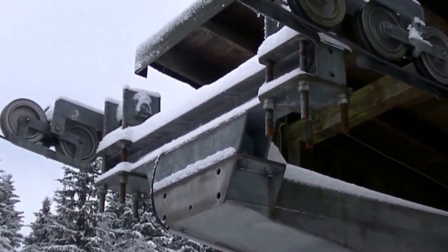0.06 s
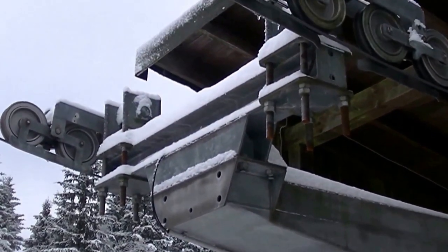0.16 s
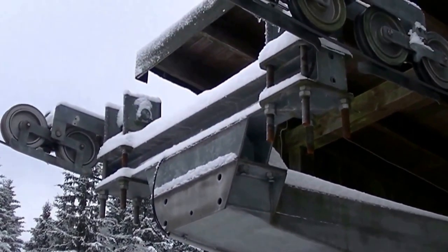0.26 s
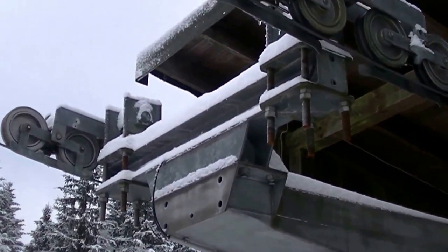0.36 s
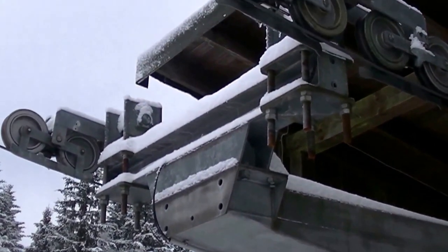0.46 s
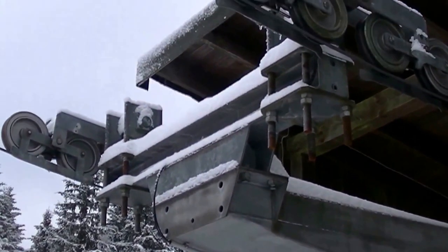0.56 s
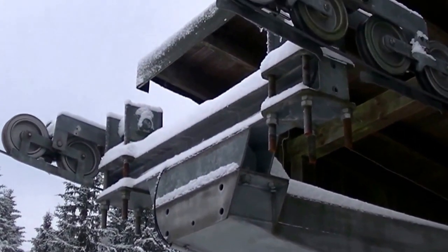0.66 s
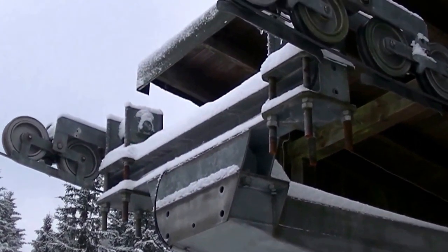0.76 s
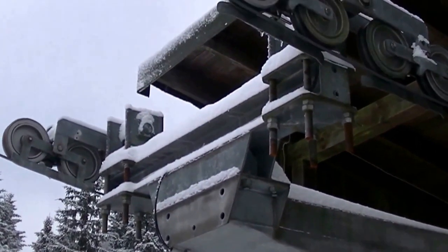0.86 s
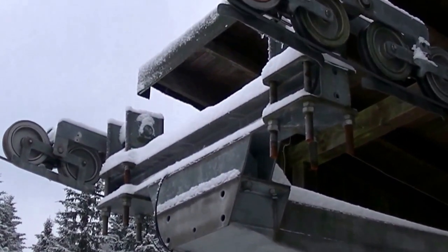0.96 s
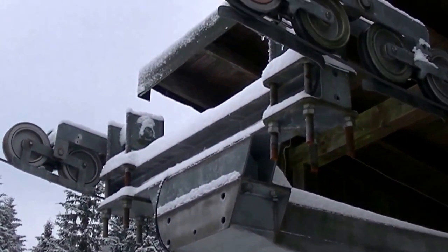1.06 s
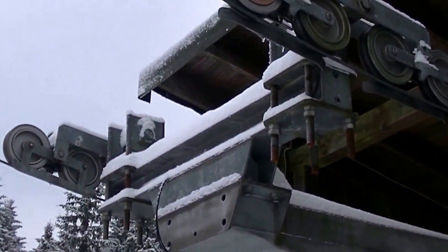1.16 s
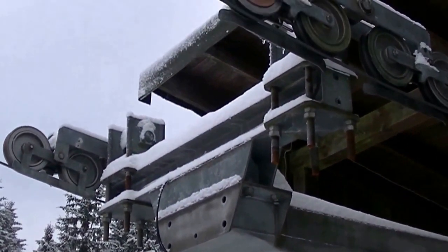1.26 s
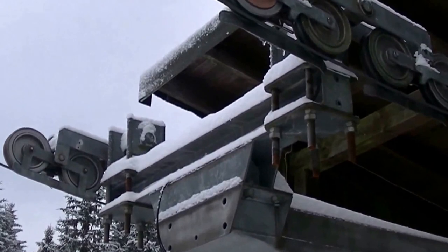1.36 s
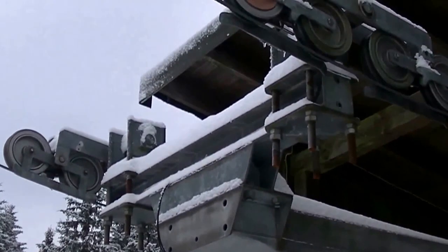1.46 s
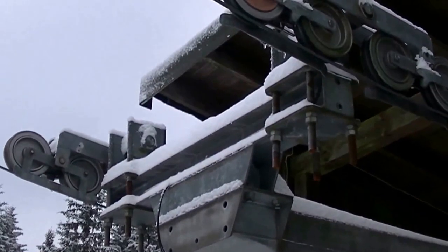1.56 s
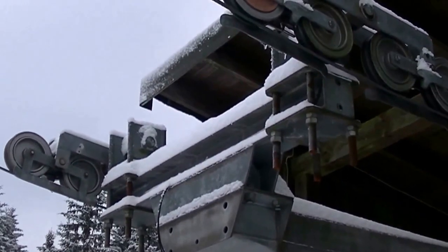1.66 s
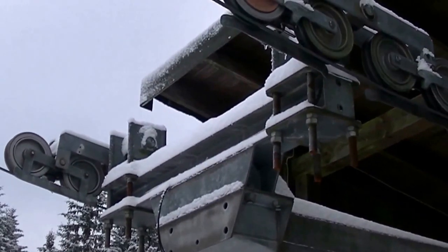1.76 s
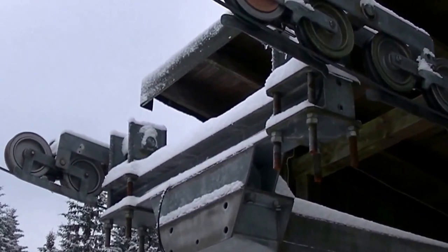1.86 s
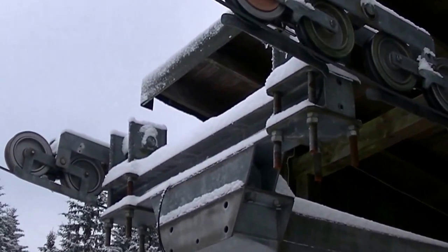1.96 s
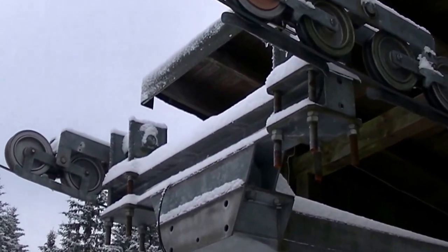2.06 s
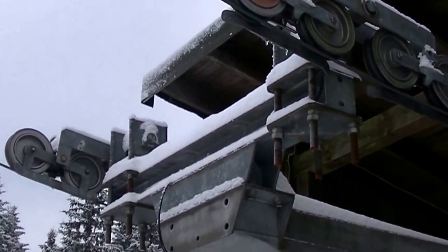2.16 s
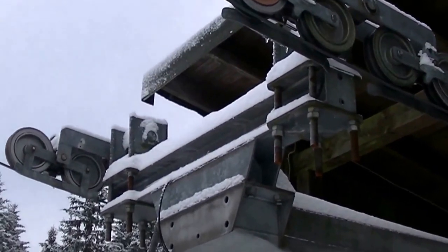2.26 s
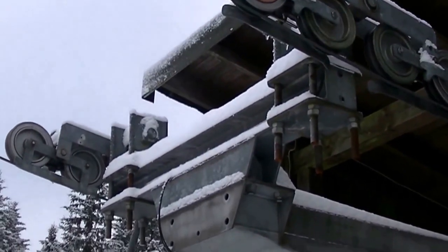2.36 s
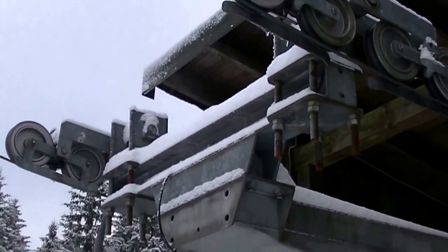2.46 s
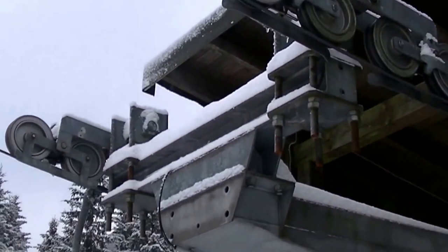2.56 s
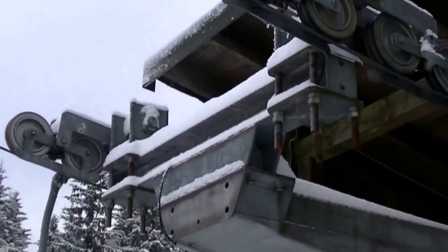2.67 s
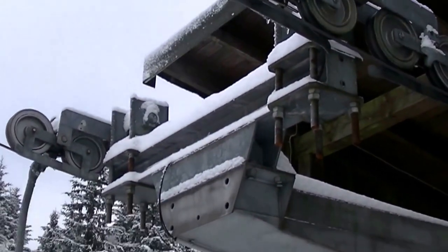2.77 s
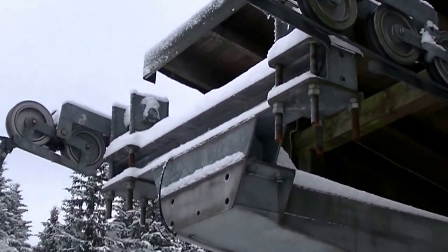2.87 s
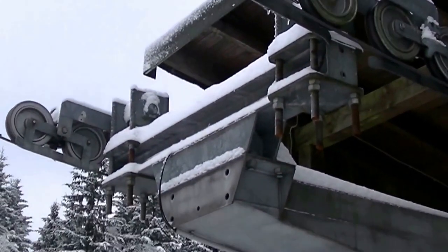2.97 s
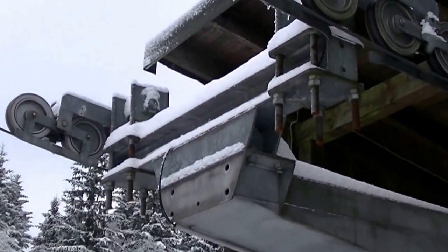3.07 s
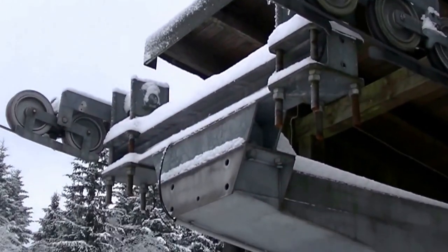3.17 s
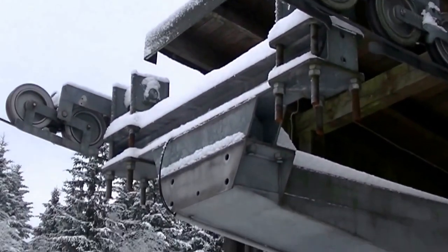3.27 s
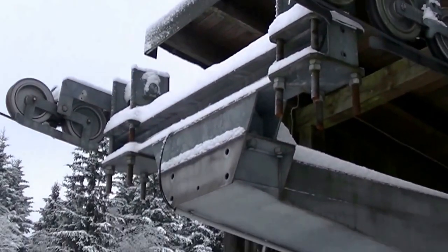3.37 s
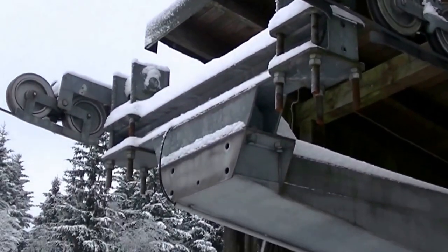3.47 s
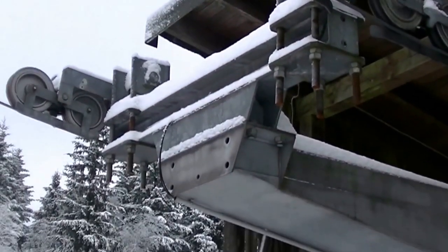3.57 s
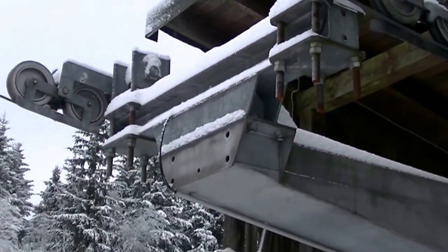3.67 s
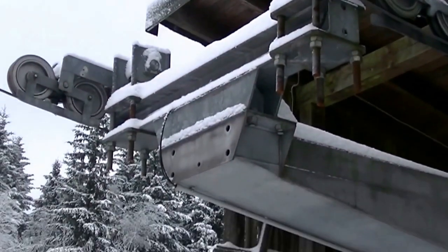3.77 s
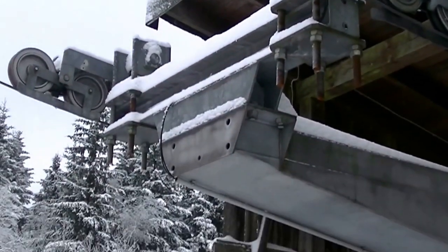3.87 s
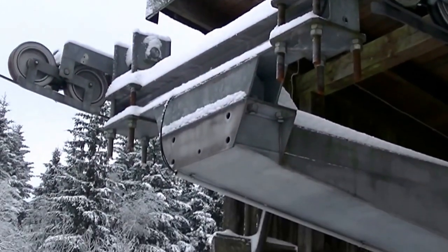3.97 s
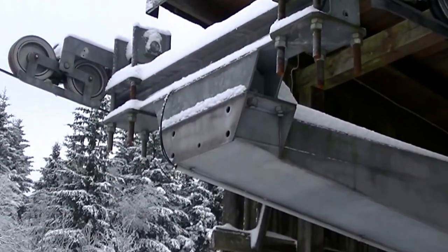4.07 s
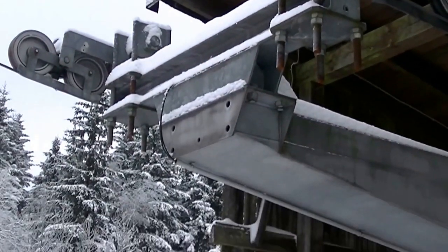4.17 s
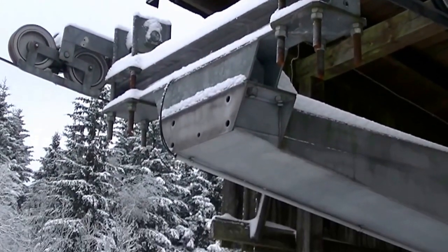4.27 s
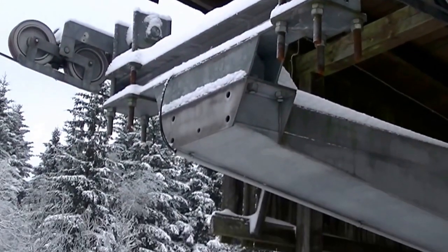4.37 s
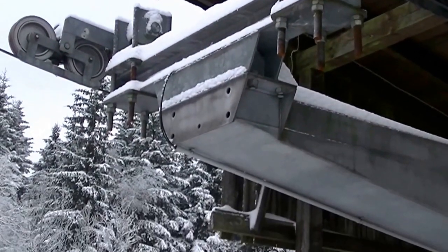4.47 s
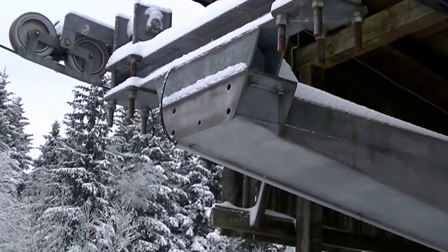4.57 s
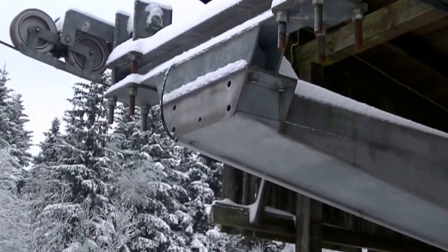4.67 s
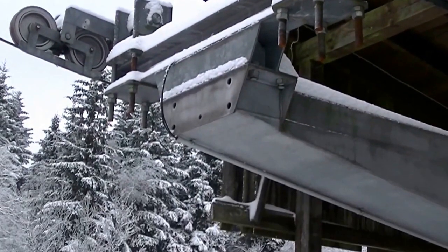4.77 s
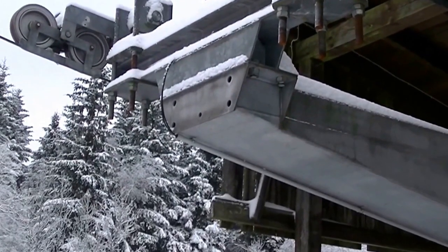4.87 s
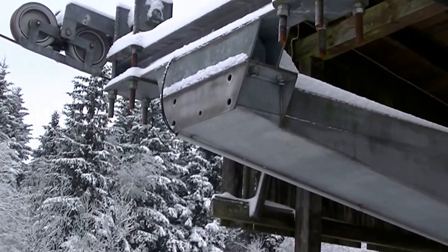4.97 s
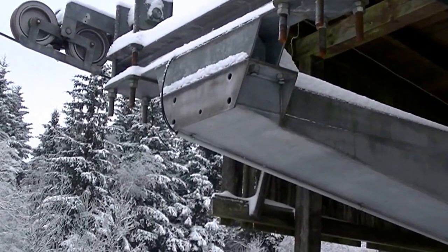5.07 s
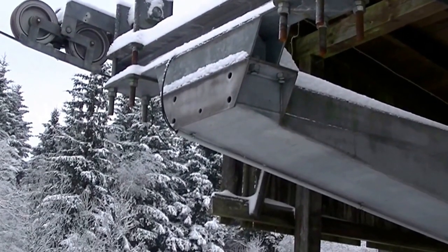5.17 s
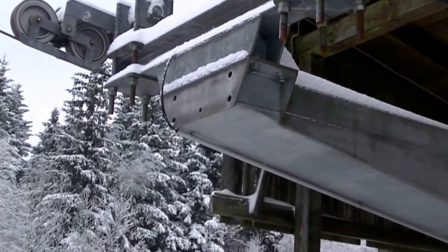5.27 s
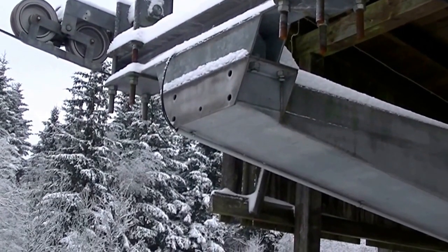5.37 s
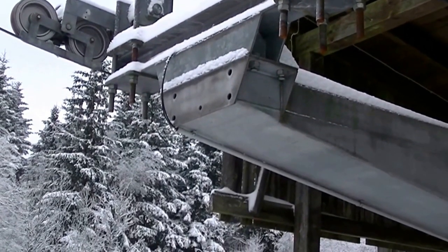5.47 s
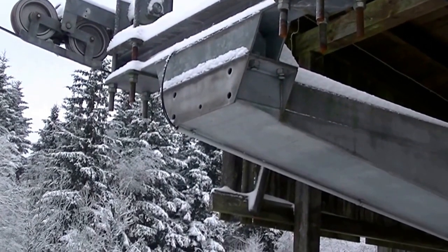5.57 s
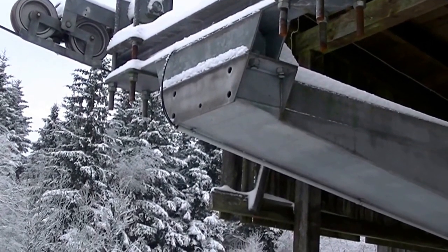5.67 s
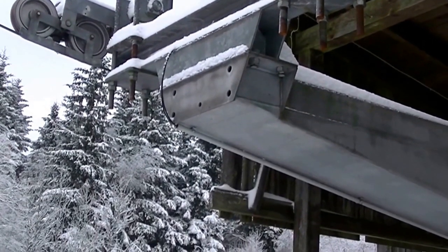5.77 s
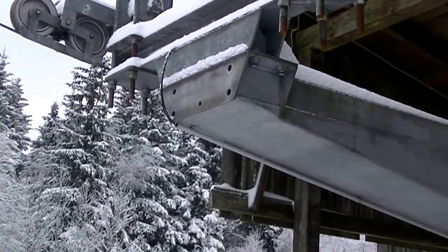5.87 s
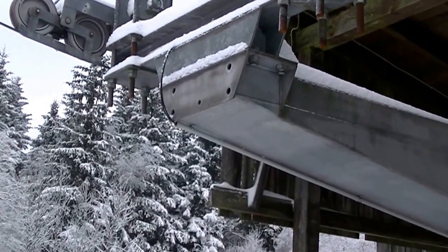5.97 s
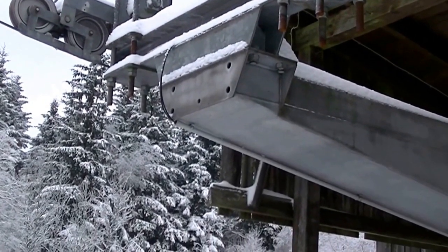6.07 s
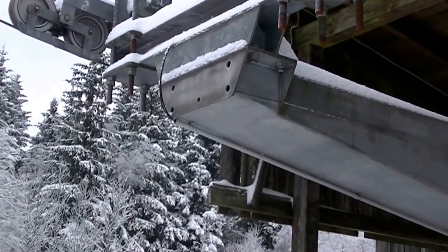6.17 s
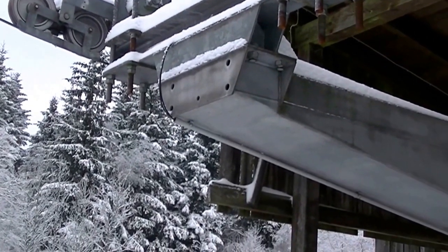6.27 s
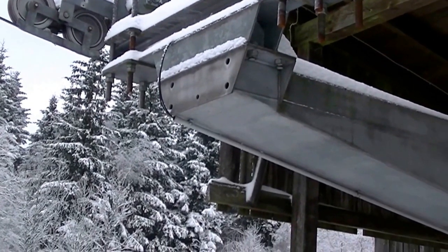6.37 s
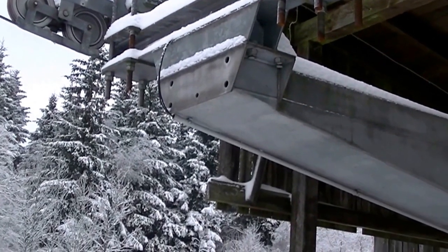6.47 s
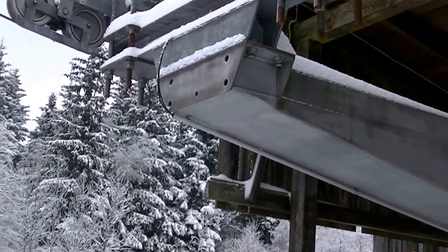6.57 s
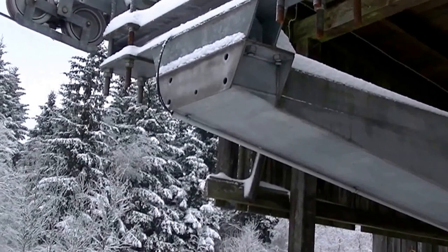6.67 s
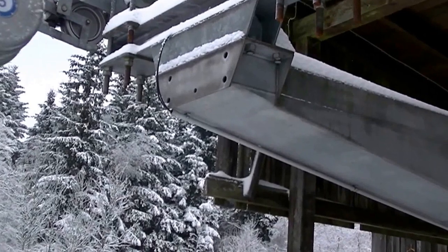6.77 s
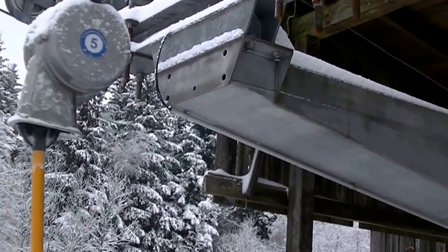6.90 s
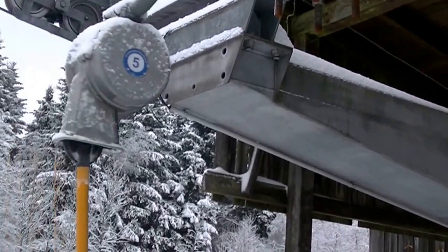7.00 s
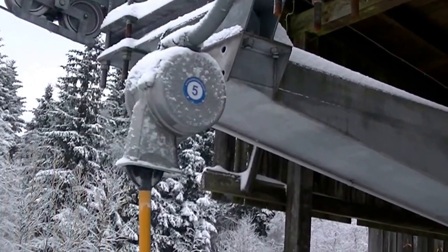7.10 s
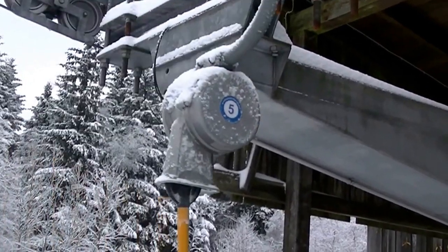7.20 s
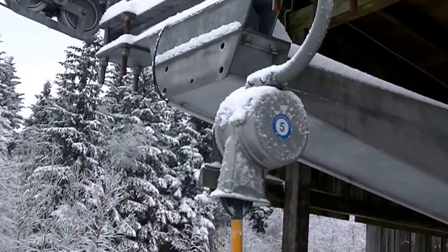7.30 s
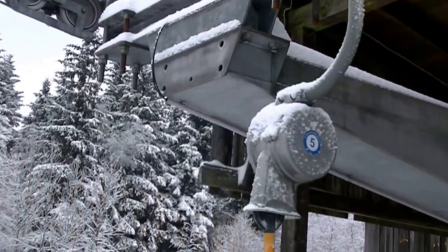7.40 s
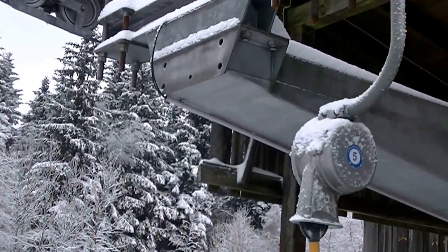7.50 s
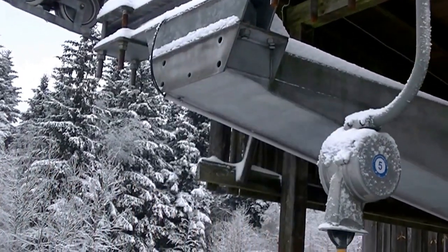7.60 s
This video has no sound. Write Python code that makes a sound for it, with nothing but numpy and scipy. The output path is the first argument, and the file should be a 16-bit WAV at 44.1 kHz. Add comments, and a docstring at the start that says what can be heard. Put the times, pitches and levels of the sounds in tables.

```python
"""An empty drag lift runs in a snowy wood, heard from under its steel end station.
From the start the twisted cable drums on the wheels as a comb of hum lines, with faint drive whines.
Rope and bearings hiss through the ringing frame, a dry bearing squeals and loose parts rattle faintly.
From about 2.2 s a loose catch ticks, and the grips of passing hangers knock and rattle over the wheels.
A few soft bumps of the hand follow from 3.2 s; ticks and rattling return after 5 s, knocks after 7 s."""
import sys
import numpy as np
from scipy import signal
from scipy.fft import rfft, irfft
from scipy.io import wavfile
from scipy.ndimage import map_coordinates

SR = 44100
rng = np.random.default_rng(int(sys.argv[2]) if len(sys.argv) > 2 else 0)


def pcm_store(signal):
    """Save signal as 16-bit PCM."""
    levels = np.round(np.clip(np.atleast_2d(signal), -1, 1) * 32767)
    wavfile.write(sys.argv[1], SR, levels.astype(np.int16).T)


def convert_level_to_amplitude(level_db):
    """Map a level in decibels to its linear amplitude factor."""
    exponent = np.asarray(level_db, float) / 20
    return 10 ** exponent


N = 336924
T = np.arange(N) / SR  # time of each sample, s
F = np.maximum(np.fft.rfftfreq(N, 1 / SR), 1)  # frequency of each spectrum bin, Hz


def unit(x):
    """Scale to rms 1."""
    return x / np.sqrt(np.mean(x ** 2))


def over_hz(table, hz=F):
    """Read (Hz, value) rows on a log-frequency axis."""
    f, v = np.transpose(table)
    return np.interp(np.log(hz), np.log(f), v)


def over_time(table):
    """Read every column of (s, value, ..) rows at each sample."""
    s, *columns = np.transpose(table)
    return [np.interp(T, s, c) for c in columns]


def walk(rate):
    """Smooth chance that turns about rate times a second; spread near 1."""
    points = rng.standard_normal(200)
    coarse = T[::64]
    curve = map_coordinates(points, [coarse * rate], order=3, mode="wrap")
    return np.interp(T, coarse, curve)


def tone(hz, waver_db, drift):
    """A sine whose level and phase wander, as several wheels sound it a little out of step."""
    phase = 2 * np.pi * (hz * T + rng.random()) + drift * walk(2.5)
    return np.sqrt(2) * convert_level_to_amplitude(waver_db * walk(3.418)) * np.sin(phase)


def hum():
    """Cable strands crossing the wheels drum at multiples of one rate; the drive adds faint whines."""
    strand_hz = 15.478  # strands of the cable crossing a wheel each second
    # Hum lines. Each row: multiple of the strand rate, level in dB.
    hum_lines = [(7, -88), (9, -83), (10, -81), (13, -70.5), (14, -71), (15, -70), (16, -66), (19, -71),
                 (20, -69), (22, -65), (23, -66), (24, -66), (27, -66), (28, -64), (29, -63), (31, -63),
                 (32, -70), (33, -68), (34, -60), (35, -67), (36, -61), (37, -71), (38, -68), (39, -67),
                 (41, -71), (44, -62), (51, -67)]
    # The two loudest lines swell and fade as the wheels drift in and out of step.
    # Each row of both: time in seconds, level in dB.
    deep_line = [(0.0, -50.5), (0.59, -48), (1.06, -59), (1.51, -50.5), (1.76, -56.5), (2.53, -50.5),
                 (2.64, -57.5), (3.51, -48), (4.06, -53), (5.26, -57), (5.3, -52.5), (6.21, -49.5),
                 (6.43, -56.5), (7.06, -47.5), (7.4, -51.5), (7.43, -61), (7.6, -50), (7.64, -57)]
    high_line = [(0, -55), (.28, -50), (.46, -63), (.6, -50), (.78, -61), (1.17, -50.5), (1.5, -73),
                 (2.14, -55.5), (2.34, -51), (2.7, -64), (3.11, -69), (3.26, -49), (3.53, -73),
                 (3.88, -44.5), (4.05, -60), (4.18, -51.5), (4.49, -63), (4.7, -51), (5.7, -65),
                 (5.98, -48), (6.46, -62.5), (7.08, -55), (7.51, -46.5), (7.64, -56)]
    # Whines of the drive. Each row: pitch in Hz, level in dB.
    drive_whines = [(984, -66), (1297, -67.5), (1610, -68.5)]
    comb = sum(convert_level_to_amplitude(db) * tone(k * strand_hz, waver_db=2.2, drift=.85) for k, db in hum_lines)
    deep = convert_level_to_amplitude(*over_time(deep_line)) * tone(21 * strand_hz, waver_db=1, drift=.2)
    high = convert_level_to_amplitude(*over_time(high_line)) * tone(26 * strand_hz, waver_db=1, drift=.5)
    whines = sum(convert_level_to_amplitude(db) * tone(hz, waver_db=2.5, drift=1.94) for hz, db in drive_whines)
    return comb + deep + high + whines


def smear(t60):
    """Countless small plate modes: a noisy ring falling 60 dB in t60 s, even on average, finely rippled."""
    ring = rng.standard_normal(SR // 4) * np.exp(-np.log(1000) * T[:SR // 4] / t60)
    return rfft(unit(ring), N) / np.sqrt(SR // 4)


def frame_colour():
    """Broad colour of the running noise, the frame's peaks as one listening place finds them, and its fine ripple."""
    # Broad colour. Each row: frequency in Hz, relative level in dB.
    hiss_colour = [(30, -43), (95, -30.5), (150, -14), (330, -3.5), (600, -0.5), (720, -7.5), (1300, -5.5),
                   (2250, -7.5), (2700, -3), (3800, -2), (5600, 0), (6100, -5), (9800, -24), (10300, -31),
                   (15500, -29.5)]
    # Resonances of the steel frame, before small chance shifts.
    # Each row: frequency in Hz, width in Hz, lift in dB.
    frame_peaks = [(840, 23, 3.5), (1085, 13, 4.5), (1640, 120, 3), (2578, 20, 7), (2713, 16, 6),
                   (2925, 75, 3.5), (3400, 460, 4.5), (3935, 22, 5), (4150, 28, 5), (4400, 400, 1.5),
                   (4900, 92, 5), (5010, 440, 2.5), (5290, 86, 5.5), (5450, 25, 3), (5640, 24, 4.5),
                   (12000, 1950, 7)]
    lift = 0
    for hz, width, db in frame_peaks:
        louder, higher = rng.standard_normal(2)
        offset = (F - hz * (1 + .0025 * higher)) / width
        lift = lift + (convert_level_to_amplitude(db + 1.5 * louder) ** 2 - 1) / (1 + (2 * offset) ** 2)
    peaks = np.sqrt(np.maximum(1 + lift, .1))
    return convert_level_to_amplitude(over_hz(hiss_colour)) * peaks * (1 + .3 * smear(.12))


def grit(rate, spread_db):
    """Scattered clicks of uneven size, about rate of them a second, scaled to rms 1."""
    where, size, sign = rng.random((3, N))
    loudness = convert_level_to_amplitude(-spread_db * np.log(size + 0.013))
    return unit((where < rate / SR) * loudness * np.sign(sign - .5))


def running():
    """Rope and bearings: hiss plus grit, each octave flickering; the frame's peaks shift as the microphone drifts."""
    # Loudness of the hiss before a steady 0.5 dB lift. Each row: time in seconds, level in dB.
    run_level = [(0.0, -42), (1.25, -42), (2.72, -42), (6.74, -41.5), (7.45, -41), (7.64, -40.5)]
    push = rfft(rng.standard_normal(N) + convert_level_to_amplitude(-7.5) * grit(900, spread_db=4.0))
    together, flicker = walk(14), 0
    for octave in range(8):
        # overlapping octave bands, counted up from 90 Hz
        share = np.clip(1 - abs(np.clip(np.log2(F / 90), 0, 7) - octave), 0, 1)
        waver_db = 0.2 * together + (0.57 + 0.028 * octave) * walk(9)
        flicker = flicker + irfft(push * share, N) * convert_level_to_amplitude(waver_db)
    push, hiss = rfft(flicker), 0
    places = np.linspace(0, T[-1], 5)
    for s in places:
        # fade from one listening place into the next
        nearness = np.clip(1 - abs(T - s) / places[1], 0, 1)
        hiss = hiss + nearness * irfft(push * frame_colour(), N)
    return unit(hiss) * convert_level_to_amplitude(over_time(run_level)[0] + 0.5)


def shaking():
    """Strength of the rattle: a steady faint part plus a quick rise and slow fade at each shake."""
    rattle_db, rise_s = -56.5, 0.0037
    # Spells of rattling, before their rise and fade.
    # Each row: start in seconds, level in dB, fade time in seconds.
    shakes = [(2.22, -45.5, 0.92), (2.62, -50, 0.46), (3.08, -48, 0.18), (6.42, -44.5, 0.27),
              (6.82, -44, 0.4), (7.22, -42, 0.57), (7.48, -44.5, .3)]
    power = convert_level_to_amplitude(rattle_db) ** 2
    for s, db, fade_s in shakes:
        since = np.maximum(T - s, 0)
        swell = (1 - np.exp(-since / rise_s)) * np.exp(-since / fade_s)
        power = power + (convert_level_to_amplitude(db) * swell) ** 2
    return np.sqrt(power)


def rattle():
    """Loose parts chatter as sparse clicks that ring the frame, with more middle than the hiss."""
    body = 1 + convert_level_to_amplitude(4.5) / (1 + ((F - 1100) / 900) ** 2)
    bass_cut = 1 / (1 + (200.0 / F) ** 4)
    clicks = rfft(grit(700, spread_db=3.0))
    chatter = irfft(clicks * smear(0.021) * frame_colour() * body * bass_cut, N)
    return unit(chatter) * shaking()


def squeal():
    """A dry bearing: gritty rubbing in three narrow resonances, each swelling on its own."""
    # Resonances of the squeal. Each row: frequency in Hz, width in Hz, middle level in dB.
    squeal_peaks = [(3290, 40, -57.5), (3410, 60, -56), (3665, 30, -59)]
    push = rfft(rng.standard_normal(N) + grit(1500, spread_db=2.0))
    out = 0
    for hz, width, db in squeal_peaks:
        ring = unit(irfft(push / (1 + 2j * (F - hz) / width), N))
        out = out + ring * convert_level_to_amplitude(db + 1.5 * walk(3.0) + 2.5 * walk(17))
    return out


def air():
    """Faint low air noise that differs left and right."""
    noise = irfft(rfft(rng.standard_normal((2, N))) / (1 + (F / 110) ** 2), N)
    return convert_level_to_amplitude(-87.0) * unit(noise)


def ticks():
    """Small bright ticks of a loose catch: three modes near 5 kHz and three higher ones, soon gone."""
    # Ticks, at strengths that are later shared among the modes.
    # Each row: start in seconds, strength in dB of the lower three modes, of the higher three.
    catch_ticks = [(2.19, -34, -35), (2.5983, -32, -35), (5.486, -28, -50), (6.488, -30, -35),
                   (6.81, -26, -46), (6.8594, -35, -47), (7.191, -25, -32), (7.2268, -19.5, -48),
                   (7.239, -27, -46), (7.2494, -27, -46), (7.2703, -26, -49), (7.2974, -31, -49),
                   (7.312, -32, -47), (7.394, -27, -31), (7.45, -26, -46), (7.514, -35, -48),
                   (7.6035, -23, -31)]
    # What the catch rings with, before slight detuning: frequencies in Hz.
    catch_hz = [4850, 5300, 5700, 6800, 7400, 8100]
    t = T[:SR // 20, None]
    out = np.zeros(N + len(t))
    fade = np.exp(-t / 0.0019) * (1 - np.exp(-t / 0.00028))
    for s, low_db, high_db in catch_ticks:
        hz = np.array(catch_hz) * (1 + .025 * rng.standard_normal(6))
        ring = fade * np.sin(2 * np.pi * hz * t)
        start = int(s * SR)
        out[start:start + len(t)] += ring @ convert_level_to_amplitude(np.repeat([low_db, high_db], 3)) / 1.8
    return out[:N]


def blows():
    """Each blow rings the grip modes, chopped by the chatter of loose parts, with a short crack and a noisy tail."""
    # Blows of the grips. Each row: time in seconds, then strength in dB, before mode levels and crack lift, of
    # the thud near 1000 Hz, ring near 1900 Hz, clank near 2900 Hz, chink near 4300 Hz, snap above 6500 Hz.
    grip_blows = [(2.2225, -41, -32.5, -29, -30.5, -39), (2.2313, -40, -51, -34, -38, -41),
                  (2.239, -54, -37, -42, -50, -46), (2.2483, -43, -34, -45, -48, -50),
                  (2.3506, -44, -37, -28, -50, -46), (2.3622, -35, -33, -40, -33.5, -39),
                  (2.368, -42, -38, -47, -46, -48), (2.379, -44, -44, -35, -39, -45),
                  (2.39, -40, -41, -47, -39, -43), (2.408, -43, -36, -46, -52, -45),
                  (2.595, -44, -43, -47, -40, -47), (2.6077, -44, -37, -36, -41, -43),
                  (2.6194, -42, -27.5, -38, -34, -41), (2.639, -45, -34.5, -36, -47, -47),
                  (2.652, -40, -40, -36, -49, -50), (2.7771, -40, -31, -38, -49, -43),
                  (2.79, -53, -26.5, -37, -34, -42), (2.7948, -47, -43, -37, -38, -44),
                  (2.806, -54, -37, -45, -52, -52), (2.84, -45, -42, -46, -50, -50),
                  (2.8835, -41, -32, -43, -42, -43), (3.004, -38, -40, -43, -44, -44),
                  (3.0772, -44, -35, -31.5, -35, -50), (3.1104, -35, -32.5, -40, -44, -38),
                  (3.117, -36, -38, -41, -42, -37), (3.1775, -43, -38, -44, -43, -45),
                  (3.3587, -43, -40.5, -47, -46, -47), (7.043, -41, -43, -45, -44, -47),
                  (7.2099, -29, -39, -42, -50, -52), (7.226, -38, -38, -40, -42, -51),
                  (7.259, -39, -43, -46, -45, -53), (7.271, -38, -49, -48, -44, -51),
                  (7.2976, -37, -40.5, -39, -48, -52), (7.6173, -34, -39.5, -41, -49, -48)]
    # Frequencies in Hz that the five strengths belong to.
    blow_hz = [1000, 1900, 2900, 4300, 6500]
    # What the grip and wheel bracket ring with, before slight detuning.
    # Each row: frequency in Hz, relative level in dB, share of the ring time.
    grip_modes = [(620, -7, 1), (850, -7, .7), (1050, -4, .6), (1360, -5, .7), (1800, -7, 1.2),
                  (1868, -9, 3.2), (1915, -6, 1), (2100, -11, 1), (2660, -6, .8), (2810, -4, 1.4),
                  (2930, -2, 1.7), (3680, -4, .6), (4150, -4, .9), (4300, 0, .9), (4900, -2, .7),
                  (5670, -3, .6), (7300, -12, .3)]
    ring_s = 0.055  # time in which a mode of share 1 falls by 60 dB
    chatter_depth = .7
    lead = 400  # samples of room for what the filters spread ahead of the blow
    out, t = np.zeros(N + SR // 4), T[:SR // 4, None]
    hz, db, share = np.transpose(grip_modes)
    f = np.maximum(np.fft.rfftfreq(len(t), 1 / SR), 1)
    edges = 1 / (1 + (400 / f) ** 4) / (1 + (f / 7000) ** 5)  # softens both ends of the spectrum
    spark = convert_level_to_amplitude(-17) * np.exp(-((f - 13000) / 2600) ** 2)
    snap = 1.2 * np.exp(-t[:, 0] / .0022)
    tail = convert_level_to_amplitude(-9) * np.exp(-np.log(1000) * t[:, 0] / (3 * ring_s))
    fade = np.exp(-np.log(1000) * t / (ring_s * share)) * (1 - np.exp(-t / 0.0005))
    for s, *strengths in grip_blows:
        colour = list(zip(blow_hz, strengths))
        vary, detune = rng.standard_normal((2, len(hz)))
        shake = signal.resample(rng.standard_normal((50, len(hz))), len(t))
        chatter = 1 + chatter_depth * np.clip(t / .01, 0, 1) * shake
        loudness = convert_level_to_amplitude(db + over_hz(colour, hz) + 1.3 * vary)
        swing = np.sin(2 * np.pi * hz * (1 + 0.012 * detune) * t + vary)
        modes = (loudness * fade * chatter * swing).sum(axis=1)
        noise = rng.standard_normal(len(t))
        crack = rfft(noise * snap) * (edges + spark) + rfft(noise * tail) * edges
        crack = crack * convert_level_to_amplitude(over_hz(colour, f) + 9.0)
        blow = irfft(rfft(modes) * edges + crack, len(t))
        start = int(s * SR) - lead
        out[start:start + len(t)] += np.roll(blow, lead)
    return out[:N]


def bumps():
    """Dull single swings at 62 Hz as the hand bumps the microphone."""
    # Soft bumps, before their short swell. Each row: start in seconds, strength in dB.
    hand_bumps = [(3.172, -64), (3.944, -63), (4.258, -72), (4.444, -68)]
    out = 0
    for s, db in hand_bumps:
        swell = np.exp(-((T - s - .02) / 0.0084) ** 2)
        out = out + convert_level_to_amplitude(db) * swell * np.sin(2 * np.pi * 62 * (T - s))
    return out


def ports(x):
    """Two close ports colour and delay the sound differently; a scattered share shifts as the hand drifts."""
    # Loudness between the ports. Each row: frequency in Hz, left minus right in dB.
    port_lean = [(60, -0.5), (110, -3.5), (200, -8.0), (380, -8.5), (700, -6.0), (1290, -2.0), (2380, -1.0),
                 (4400, 1.5), (8120, 1.0), (15000, 0.0)]
    # Timing between the ports. Each row: frequency in Hz, lead of the left in radians.
    port_lead = [(0, 0), (950, 0.6), (2580, 0.3), (3530, 0.5), (4740, 0.1), (5680, 0.2), (6460, -0.3),
                 (8700, 0.0), (15400, -0.0)]
    # Likeness that sets the scattered share. Each row: frequency in Hz, likeness from 0 to 1.
    port_alike = [(60, 0.1), (130, 0.62), (290, 0.91), (640, 0.83), (1410, 0.77), (3100, 0.87),
                  (6820, 0.92), (15000, 0.95)]
    lean = convert_level_to_amplitude(over_hz(port_lean) / 2) * np.exp(.5j * over_hz(port_lead))
    alike = over_hz(port_alike)
    scatter = 0.81 * np.sqrt((1 - alike) / (1 + alike))
    out, sound, places = 0, rfft(x), np.linspace(0, T[-1], 9)
    for s in places:
        side = scatter * smear(0.17)
        pair = np.array([(1 + side) * lean, (1 - side) / lean])
        pair = pair / abs(pair.mean(axis=0))  # keeps the level of the middle even
        nearness = np.clip(1 - abs(T - s) / places[1], 0, 1)
        out = out + nearness * irfft(sound * pair, N)
    return out


def scene():
    """The station through the two ports, with air noise and bumps at the microphone."""
    station = hum() + running() + rattle() + squeal() + ticks() + blows()
    return ports(station) + air() + bumps()


def low_pass(x):
    """Removes everything above the highest recorded frequency."""
    return signal.sosfilt(signal.butter(12, 15840, fs=SR, output="sos"), x)


def record(dry):
    """The microphone cuts the deep bass below about 27 Hz."""
    cut = signal.butter(2, 27, "high", fs=SR, output="sos")
    mix = signal.sosfilt(cut, dry)
    return low_pass(mix)


dry = scene()
out = record(dry)
pcm_store(out)
```